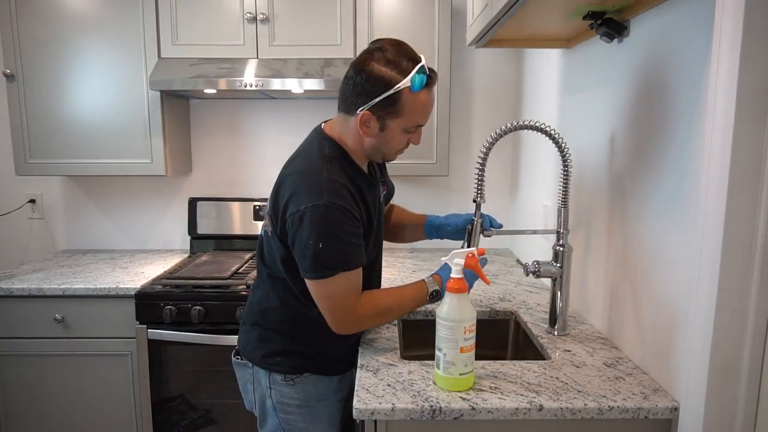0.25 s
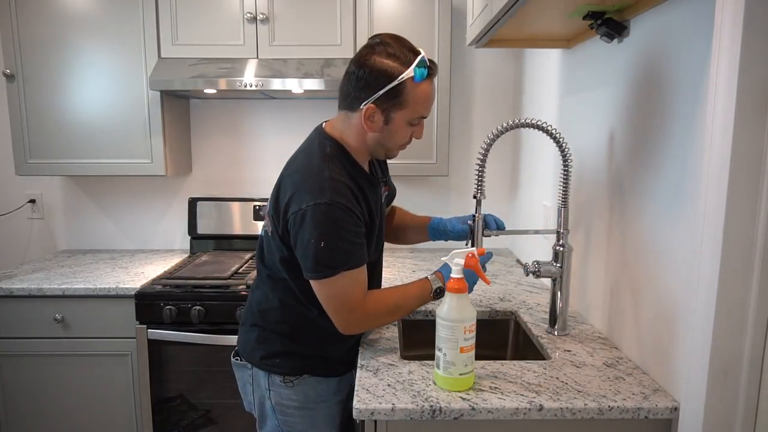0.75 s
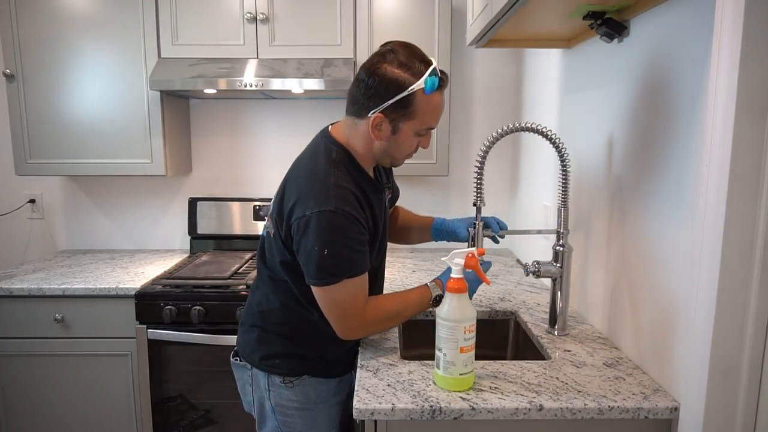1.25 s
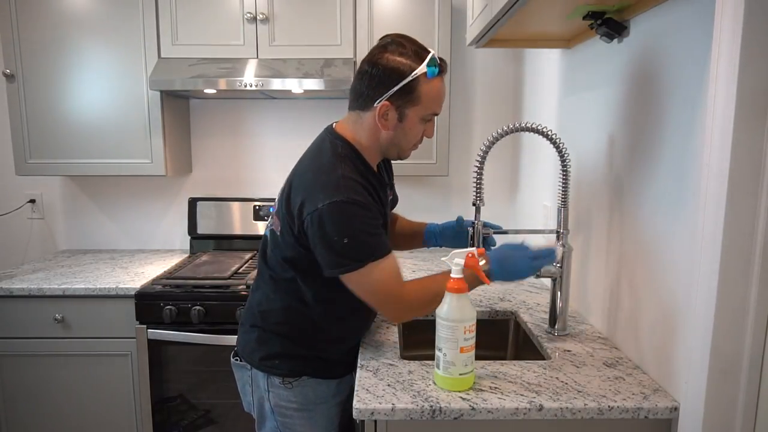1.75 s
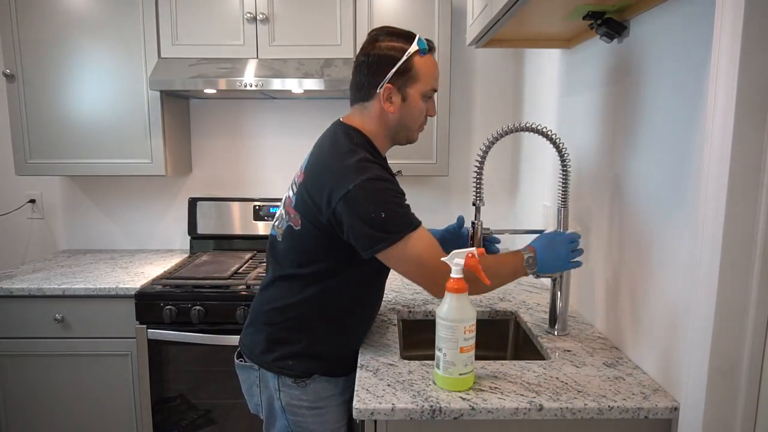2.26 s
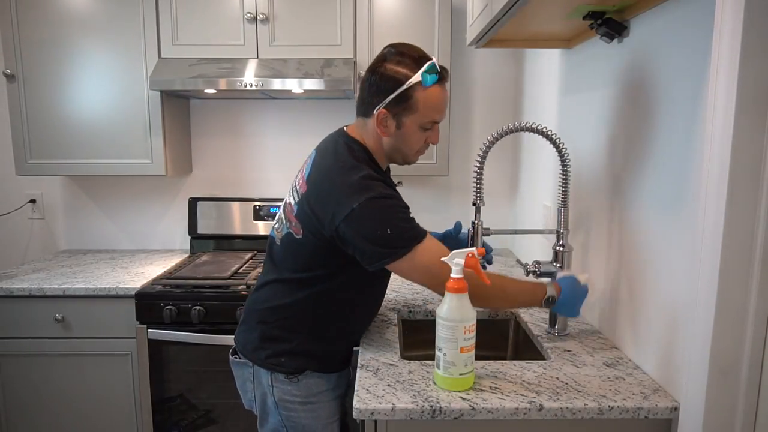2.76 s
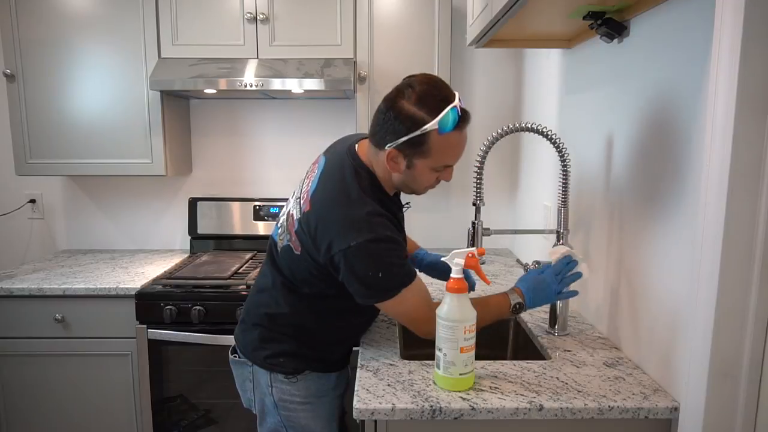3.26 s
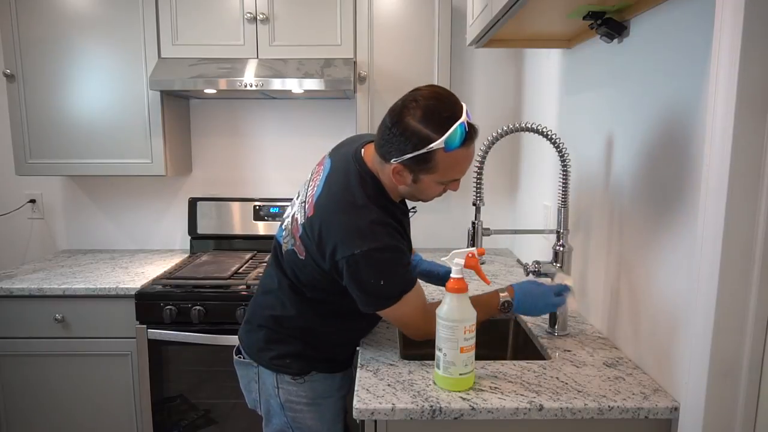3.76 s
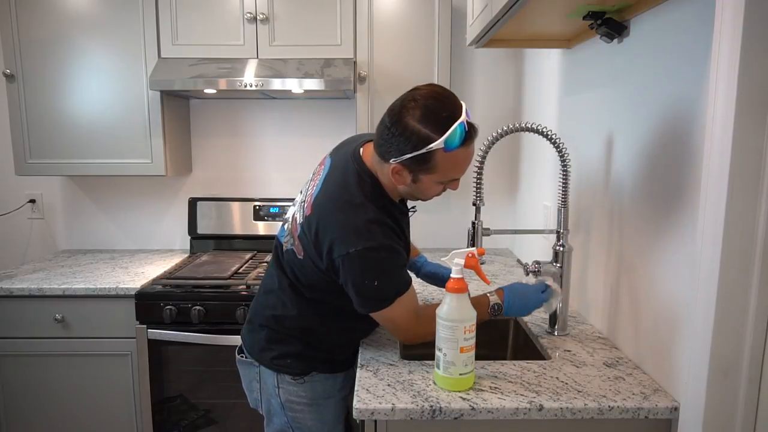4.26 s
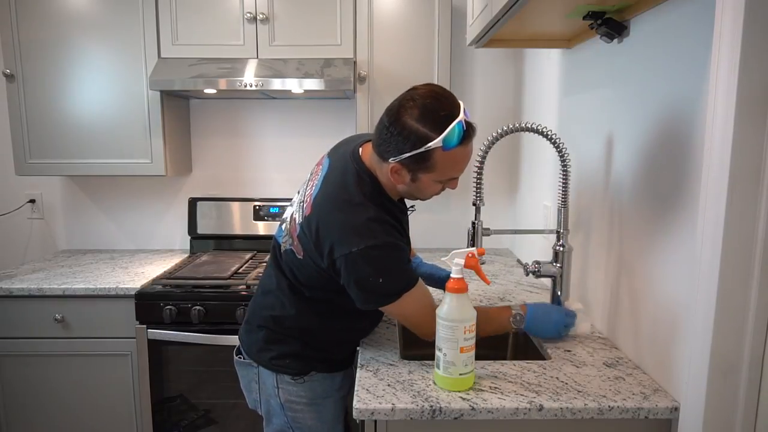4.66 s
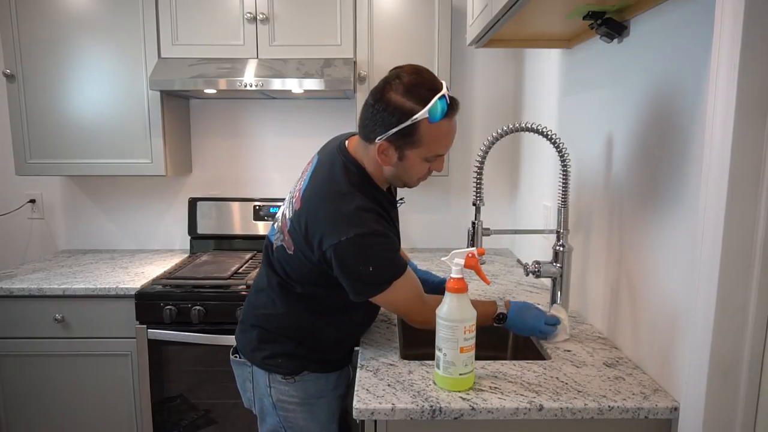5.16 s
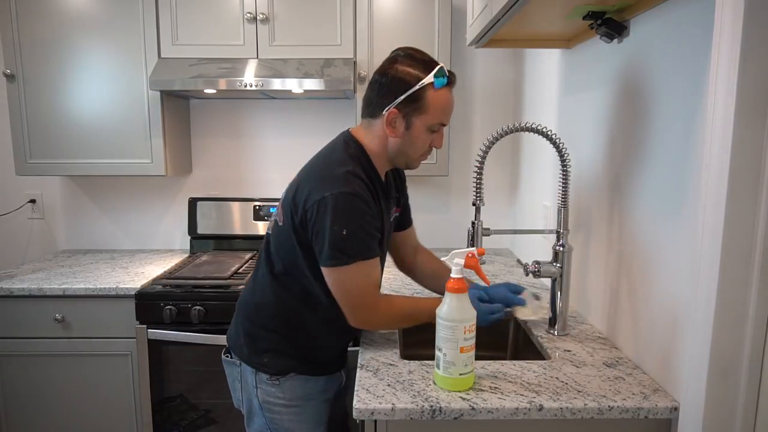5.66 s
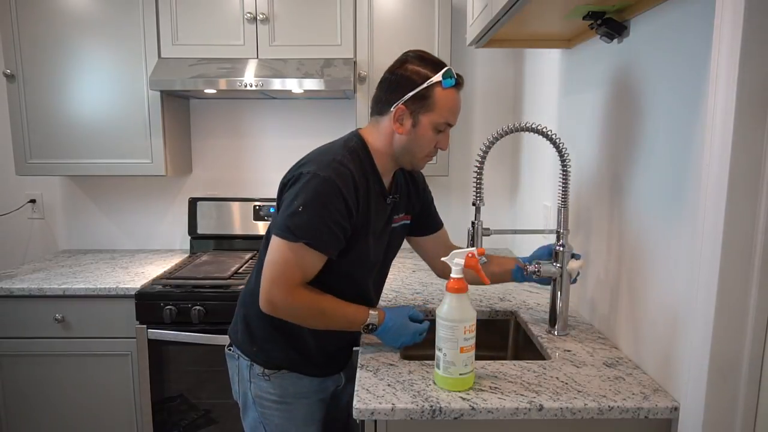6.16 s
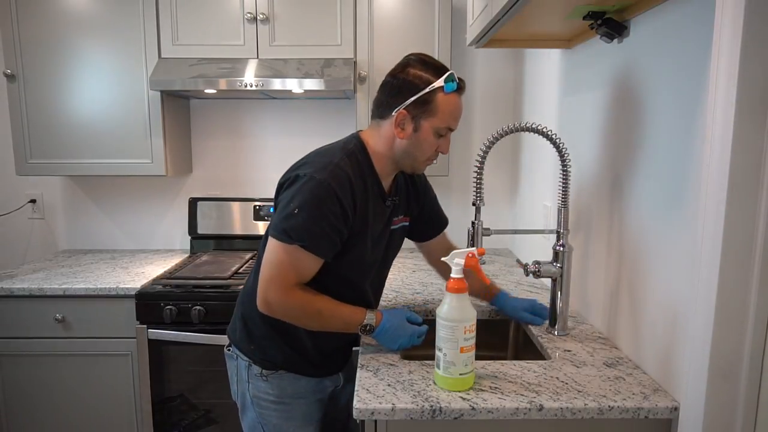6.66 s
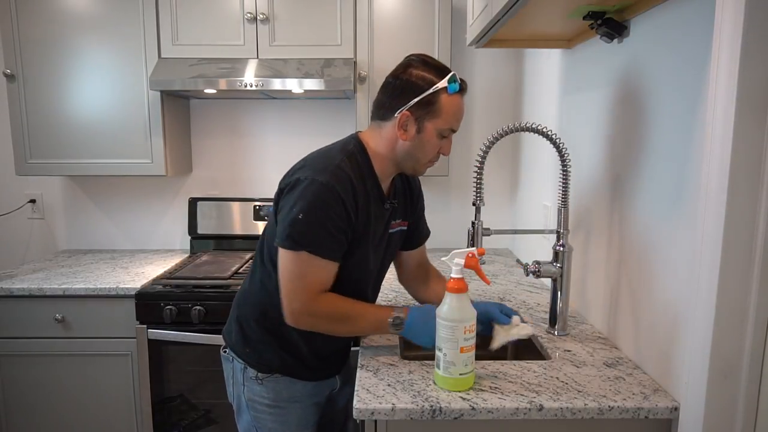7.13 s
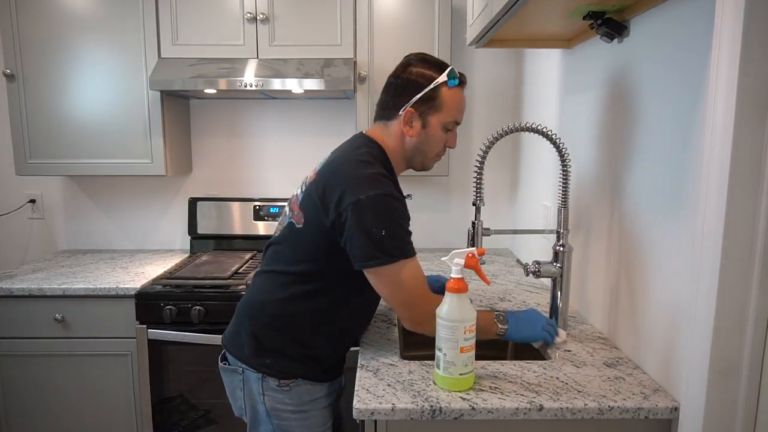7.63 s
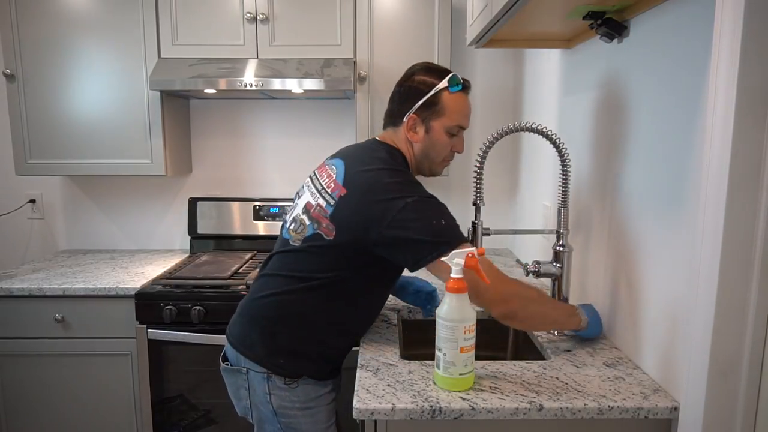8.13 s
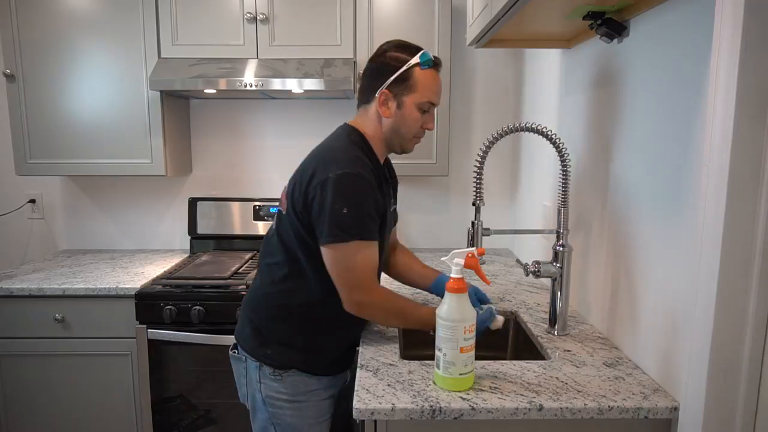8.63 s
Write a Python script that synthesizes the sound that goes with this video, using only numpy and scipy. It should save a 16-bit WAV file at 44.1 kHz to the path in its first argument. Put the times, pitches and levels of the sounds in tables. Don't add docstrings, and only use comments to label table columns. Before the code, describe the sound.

Quiet hard-walled kitchen with a steady low hum and floor rumble. After a brief swish and a dull knock comes a near pause, then one sharp metal clack with small basin pings. A gloved hand then wipes the faucet in faint short strokes, ticking against metal, and moves to broader, slightly louder strokes over the counter. The microphone is near and picks up low stand bumps; stereo briefly narrows to mono.

```python
import sys
import numpy as np
from scipy import signal
from scipy.fft import rfft, irfft, next_fast_len
from scipy.io import wavfile
from scipy.ndimage import uniform_filter1d, map_coordinates

SR = 44100
rng = np.random.default_rng(int(sys.argv[2]) if len(sys.argv) > 2 else 0)


def amp(db):
    return 10 ** (np.asarray(db, float) / 20)


def to_wav(s):
    ch = np.atleast_2d(s).T
    pcm = np.round(np.clip(ch, -1, 1) * 32767)
    wavfile.write(sys.argv[1], SR, pcm.astype(np.int16))


N = 392084
TIME = np.arange(N) / SR


def unit(x):
    return x / np.sqrt(np.mean(x ** 2) + 1e-20)


def along(points, hz):
    f, v = np.transpose(points)
    return np.interp(np.log(hz + 1), np.log(f + 1), v)


def curve(rows):
    s, value = np.transpose(rows)
    return np.interp(TIME, s, value)


def wobble(rate_hz):
    knots = rng.standard_normal(int(N * rate_hz / SR) + 4)
    return map_coordinates(knots, [TIME * rate_hz])


def filtered(x, response):
    m = next_fast_len(len(x) + 8192)
    return irfft(rfft(x, m) * response(np.fft.rfftfreq(m, 1 / SR)), m)[:len(x)]


def below(hz, corner_hz):
    return 1 / (1 + (hz / corner_hz) ** 6)


def above(hz, corner_hz, order=6):
    return 1 / (1 + (corner_hz / (hz + 1)) ** order)


def noise(spectrum):
    return unit(filtered(rng.standard_normal(N), lambda hz: amp(along(spectrum, hz))))


def resonance(hz, centre_hz, width_hz):
    return 1j * hz * width_hz / (centre_hz ** 2 - hz ** 2 + 1j * hz * width_hz)


def rough_ring(t, modes, rough):
    hz, db, t60_s = np.transpose(modes)[..., None]
    walk = np.cumsum(rng.standard_normal((len(modes), len(t))), axis=1) / np.sqrt(SR)
    drift = rough * np.sqrt(hz / 1000) * walk
    swell = 1 - np.exp(-.8 * hz * t)
    return np.sum(amp(db - 60 * t / t60_s) * swell * np.sin(2 * np.pi * hz * t + drift), axis=0)


def add_at(out, s, sound):
    out[round(s * SR):][:len(sound)] += sound


# f/Hz, density/dB per Hz
CLOTH_SPECTRUM = [(290, -12), (500, -7.5), (688, -3), (795, -6.5), (1180, -7), (1440, -5), (3200, 2.5),
                  (4340, -3.5), (10400, -16.5), (13400, -18.5), (16000, -18)]
# peak t/s, rub level/dB, press/s per 10 dB,
# ease/s per 10 dB, sink body/dB re rub
WIPES = [(0.0, -46, .02, 0.028, 5), (.04, -53, 0.038, 0.12, 3), (1.16, -64, 0.017, 0.036, 7),
         (.216, -58.5, 0.088, 0.036, 5.5), (1.5, -62, 0.24, 1, 1.5), (1.94, -61, .02, 0.019, 1),
         (2.01, -52.5, 0.031, 0.098, 5), (2.47, -58, 0.18, 0.045, 2), (2.64, -60, 0.098, 0.067, 3),
         (2.76, -56.5, 0.07, 0.11, 1.5), (2.95, -61.5, .012, 0.19, 5),
         (3.26, -54.5, 0.039, 0.047, 0), (3.3, -56, 0.043, 0.023, 4), (3.51, -59, .05, 0.078, 2),
         (3.76, -61, 0.12, 0.0083, 1), (3.88, -55.5, 0.019, 0.058, 8.5),
         (3.97, -56.5, 0.16, 0.025, -11), (4.19, -59, 0.032, 0.03, 9),
         (4.35, -58.5, 0.054, 0.012, 1), (4.44, -58.5, 0.024, 0.0065, 3),
         (4.609, -54.5, 0.018, 0.0048, 7), (4.77, -55.5, 0.019, 0.0091, 4),
         (5.08, -58.5, 0.077, 0.096, -7),
         (5.34, -57, 0.076, 0.037, 2.5), (5.54, -50, 0.047, 0.1, 1),
                 (5.68, -49.5, 0.049, 0.033, -11), (5.81, -58.5, .12, 0.14, 3), (5.96, -56, 0.13, 0.09, 4),
                 (6.31, -63, 0.029, 0.042, -3), (6.62, -52.5, 0.014, 0.15, 2.5),
                 (6.96, -56, 0.52, 0.04, -4), (7.11, -69, 0.064, 0.06, 8), (7.33, -50, 0.019, 0.22, -4),
                 (7.63, -55, 0.067, 0.25, -2.5), (7.98, -54.5, 0.96, 0.069, -1.5),
                 (8.17, -58, 0.035, 0.12, 6.5), (8.48, -53, 0.24, 0.052, 1), (8.66, -49, 0.027, .13, -0.5)]


def cloth(grain_db, patchy_db):
    grains = rng.standard_normal(N) * amp(grain_db * wobble(400))
    z = signal.stft(grains, nperseg=512)[2]
    patches = uniform_filter1d(uniform_filter1d(rng.standard_normal(z.shape), 6, 0), 8, 1)
    fibres = signal.istft(z * amp(patchy_db * unit(patches)), nperseg=512)[1][:N]
    fibres = filtered(fibres, lambda hz: amp(along(CLOTH_SPECTRUM, hz)))
    body = unit(filtered(fibres, lambda hz: below(hz, 1600)))
    rub = unit(filtered(fibres, lambda hz: above(hz, 1600) * below(hz, 6000)))
    fizz = unit(filtered(fibres, lambda hz: above(hz, 6000)))
    rest_db = -102
    rub_power = amp(2 * rest_db) * (TIME > KNOCKS[-1][0])
    body_power = rub_power.copy()
    for s, db, press_s, ease_s, body_db in WIPES:
        near = slice(max(round((s - 4 * press_s) * SR), 0), round((s + 4 * ease_s) * SR))
        t = TIME[near] - s
        power = amp(2 * db - 20 * np.maximum(-t / press_s, t / ease_s))
        rub_power[near] += power
        body_power[near] += power * amp(2 * body_db)
    fizz_level = amp(-66) * np.sqrt(rub_power / amp(-120))
    layers = np.sqrt(rub_power) * rub + amp(-2.0) * np.sqrt(body_power) * body + fizz_level * fizz
    return amp(.7 * wobble(25)) * layers


# t/s, length/s, level/dB, f/Hz, width/Hz
DRAGS = [(0, .26, -64, 14000, 3500), (0, .26, -61, 4450, 400), (.86, .14, -60, 680, 200),
         (1.07, .05, -67, 4800, 900), (1.282, .048, -41, 700, 600), (2.15, .08, -58, 680, 300),
         (2.94, .06, -58, 3350, 900), (3.0, .13, -58.5, 1350, 250), (3.48, .1, -61, 3300, 700),
         (4.31, .06, -60, 3100, 1100), (4.75, .04, -60, 3300, 1500), (5.01, .1, -60, 3300, 1100),
         (5.31, .06, -60, 3100, 1200), (4.585, .04, -57, 1200, 900), (4.8, .3, -66, 1350, 200),
         (5.19, .06, -56, 1500, 1200), (5.5, .087, -55, 430, 200), (5.52, .07, -55, 1150, 500),
         (5.53, .2, -57, 3000, 700), (6.58, .07, -57, 650, 300), (6.68, .08, -60, 2100, 600),
         (6.82, .07, -60, 2200, 1200), (6.84, .07, -59.5, 8100, 8000), (7.05, .1, -63, 4600, 500),
         (7.58, .07, -47.5, 195, 50), (7.76, .05, -55, 1200, 900), (7.9, .17, -56, 1460, 800),
         (8.11, .15, -55.5, 1520, 800), (8.15, .12, -55, 2800, 1500), (8.37, .16, -56.5, 4250, 1200),
         (8.64, .2, -65, 11000, 8000)]


def drags():
    out = np.zeros(N)
    for s, length_s, db, hz, width_hz in DRAGS:
        size = round(length_s * SR)
        drone = filtered(rng.standard_normal(SR // 2), lambda f: resonance(f, hz, width_hz) ** 2)[:size]
        add_at(out, s, amp(db + 1.5) * np.sqrt(np.hanning(size)) * unit(drone))
    return out


# f/Hz, t60/s
KITCHEN_DECAY = [(150, 1), (600, 0.79), (3000, 0.57), (8000, 0.29), (15000, 0.25)]


def kitchen(x):
    hz, t, z = signal.stft(rng.standard_normal(SR), SR, nperseg=256)
    fade = amp(-60 * t / along(KITCHEN_DECAY, hz)[:, None])
    tail = signal.istft(z * fade, SR, nperseg=256)[1]
    return signal.fftconvolve(np.pad(x, (300, 0)), tail / np.linalg.norm(tail))[:N]


# f/Hz, mid level/dB, side level/dB, side lead/rad
HUM = [(58.6, -49.5, -45.5, 1.2), (120.35, -38, -46, 1.18), (243.4, -62, -104, .3)]


def refrigerator():
    mid, side = np.zeros(N), np.zeros(N)
    for hz, mid_db, side_db, lead_rad in HUM:
        looseness = (120 / hz) ** 2
        phase = 2 * np.pi * hz * TIME + 2.54 + 0.37 * looseness * wobble(1.494)
        mid += np.sqrt(2) * amp(mid_db + .5 * looseness * wobble(1.255)) * np.cos(phase)
        side += np.sqrt(2) * amp(side_db + 1.0 * wobble(0.64)) * np.cos(phase + lead_rad)
    return mid, side


# f/Hz, density/dB per Hz
ROOM_TONE = [(12, -29), (25, -15), (60, 3), (100, -2), (160, -4.5), (190, -13), (300, -13.5), (485, -21.5),
             (1190, -31.5), (2500, -35), (3340, -32), (5380, -40), (9000, -44.5), (14700, -47),
             (16000, -54)]
# t/s, level/dB
RUSTLE = [(0, -1), (.3, -5.5), (1.28, -5), (1.5, 0), (8.9, 0)]


def room_tone():
    tone = amp(-44.5 + 0.65 * wobble(2.594)) * noise(ROOM_TONE)
    upper = filtered(tone, lambda hz: above(hz, 1100, order=4))
    tone = tone + (amp(curve(RUSTLE)) - 1) * upper
    still = amp(-.5 * np.interp(TIME, [.2, .28, 1.3, 1.4], [0, 1, 1, 0]))
    return tone + (still - 1) * filtered(tone, lambda hz: above(hz, 6000))


# f/Hz, density/dB per Hz
SIDE_TONE = [(15, -34), (38, -16), (50, 2.5), (62, 5), (75, -13), (150, -10), (200, -26), (290, -18),
             (340, -30), (420, -30), (976, -41), (1500, -45), (1900, -76), (16000, -64.5)]


def side_tone():
    return amp(-46.0 + 2.7 * wobble(2.51)) * noise(SIDE_TONE)


# t/s, level/dB
RUMBLE = [(0.0, -32), (0.17, -32), (0.57, -44.5), (2.35, -40), (2.4, -66), (2.45, -45), (3.19, -33),
          (3.29, -41), (3.94, -47), (4.41, -46), (4.53, -63), (4.61, -30.5), (5.02, -49.5), (7.57, -45),
          (7.7, -37), (8.07, -43.5), (8.37, -32.5), (8.89, -48)]


def floor_rumble():
    spectrum = [(10, -8.0), (23, -4), (33, -12), (60, -18.0), (110, -19.5), (200, -62.0), (600, -120)]
    return amp(curve(RUMBLE) - 2.5) * noise(spectrum)


# t/s, peak level/dB, f/Hz,
# crack/dB re peak
TAPS = [(1.258, -57, 7300, -14), (1.2858, -48, 850, -30), (1.574, -48, 891, -10), (1.747, -44, 2940, -25),
        (2.019, -48, 988, -19), (2.1698, -38.5, 1210, -24), (2.4676, -38.5, 1790, -28),
        (2.756, -44.5, 1620, -6), (3.027, -44, 1350, -18), (3.028, -41.5, 3200, -30),
        (3.164, -39.5, 1090, -29), (3.2424, -44, 800, -28), (3.278, -46, 3400, -28),
        (3.293, -48, 1300, -28), (3.3628, -39, 950, -26), (3.369, -50, 850, -28), (3.462, -39.5, 1410, -15),
        (3.657, -39.5, 790, -22), (3.659, -48, 1900, -24), (3.461, -47, 3000, -28),
        (3.883, -38.5, 802, -25), (4.321, -46, 3000, -26), (4.439, -62, 1360, -19),
        (4.591, -40.5, 850, -19), (4.603, -46, 1150, -12), (5.181, -34, 2700, -42),
        (5.181, -39.5, 1420, -45), (5.185, -39, 865, -45), (5.199, -41, 1510, -45), (5.198, -35, 3300, -40),
        (5.327, -46, 3000, -25), (5.472, -38, 840, -27), (5.479, -43, 800, -25), (6.31, -42, 2500, -22),
        (6.601, -41, 1050, -35), (6.615, -41, 1800, -30), (7.278, -40.5, 810, -26), (7.622, -42, 3200, -22),
        (7.3251, -36.5, 3150, -26), (7.779, -39, 950, -30), (8.134, -42, 860, -23),
        (8.626, -39.5, 774, -25),
        (.315, -53, 7400, -12), (1.08, -46, 4600, 3), (1.084, -48, 8800, -10), (1.156, -49, 3200, -12),
         (1.157, -53, 10500, -12), (1.172, -56, 10200, -14), (1.5392, -36, 1000, -18),
         (2.942, -47, 1150, -1.5), (4.364, -52.5, 802, 2), (4.75, -54, 1610, -10), (4.856, -50, 890, -1.5),
         (5.679, -36, 3340, -12), (6.2744, -41, 840, -10)]


def taps():
    out, t = np.zeros(N + SR), np.arange(SR // 10) / SR
    for s, db, hz, crack_db in TAPS:
        hiss = rng.standard_normal(len(t))
        burst = amp(-60 * t / 0.049) * hiss + 6.8 * (t == 0)
        width_hz = 0.31 * hz * (1000 / hz) ** 0.51
        knock = filtered(burst, lambda f: resonance(f, hz, width_hz) - 0.16 * resonance(f, 3400, 1360))
        crack = filtered(hiss, lambda f: resonance(f, 6800, 9000))
        crack = amp(crack_db - 2.5 - 60 * t / 0.026) * crack
        add_at(out, s, amp(db - 1.0) * (knock / abs(knock).max() + 1.7 * crack))
    return out[:N]


# t/s, level/dB
JOLTS = [(.367, -27.5), (.89, -35), (1.272, -28), (1.33, -30), (6.261, -34.5), (8.17, -51), (8.474, -50)]
# t/s, level/dB, f/Hz, t60/s
SWAY = [(0.381, -35, 101, 0.68), (.66, -50, 104, .5), (.9, -31, 92, 0.5), (1.147, -31, 87, 0.39),
        (1.297, -35, 92.6, 0.48), (2.039, -28.5, 90.8, 0.7), (4.56, -33, 98, 0.81), (4.75, -46, 96, 0.4),
        (5.2, -39, 97, 0.49), (5.88, -37, 95.3, 0.95), (6.27, -38, 93, 1), (6.581, -35.5, 93.4, 1.9),
        (7.601, -32.5, 92.6, 1), (8.48, -38, 98, 0.85)]


def stand():
    sway, jolts, t = np.zeros(N + SR), np.zeros(N + SR), np.arange(SR) / SR
    mount = [(300, 3, 0.093), (400, -4, 0.13), (295, -14.0, 2.2), (610, -17, .08), (950, -20, .07)]
    for s, db in JOLTS:
        jolt = rough_ring(t, mount, rough=9.9)
        add_at(jolts, s, amp(db) * jolt * (1 - np.exp(-t / 0.0014)))
    for s, db, hz, t60_s in SWAY:
        swing = rough_ring(t, [(hz, 0, t60_s), (0.62 * hz, -5, 0.62 * t60_s)], rough=1.9)
        add_at(sway, s, amp(db + 4.0) * swing * (1 - np.exp(-t / 0.011)))
    return sway[:N], jolts[:N]


# t/s, blow level/dB, brightness/dB
KNOCKS = [
    (0.3788, -28.5, -30),
    (1.3021, -19.5, -2),
]
# t/s after the blow, level/dB, brightness/dB
RATTLE = [
    [(0, -4, -4), (.0045, 4, 9), (.009, -4, -9), (.014, -14, -2), (.03, -20, -2), (.082, -17, -8)],
    [(.0008, 1.5, 0), (.0024, 5, 0.5), (.0068, -2, -1.5), (.0102, -5, 2), (.0145, -10, 0), (.0275, -18, 0)],
]
# f/Hz, level/dB, t60/s
HOLDER = [(126.9, 3, 0.5), (249.4, -5, 0.18), (312, 4, 0.07), (400, -9, 0.22), (526, -12, 0.43),
          (577, -4.5, 0.17), (625, -2.5, 0.096), (1000, -23, 0.077)]
# f/Hz, level/dB, t60/s
SINK = [(118.7, -4.5, 0.51), (125.8, -2, 0.9), (187, -5.5, 0.16), (382, -14.5, 0.31), (533.5, -10.5, 0.59),
        (585, -11, 0.53), (605, -15.5, 0.58), (644, -29, 0.24), (802, -7, 0.054), (979, -4, 0.07),
        (1036, 2, 0.065), (1106, -21, .15), (2110, -13, 0.12), (2970, -24, 0.42), (3200, -22, 0.4)]
# f/Hz, level/dB, t60/s
FAUCET = [(4500, -36, 0.26), (5400, -29, 0.59), (6700, -5, 0.048), (7200, -24, 0.12), (8150, -43, 0.28),
          (10900, -9.5, 0.065), (10600, -37, .2), (10700, -26, 0.12), (12680, -40, .18), (13710, -37, .19)]
# f/Hz, density/dB per Hz
CRACK = [(59, -22), (100, -33), (300, -5.5), (620, -0.5), (850, -3.5), (1060, -7), (1390, -14),
         (3320, -9.5), (7140, -19), (9410, -18), (13800, -18), (16000, -19.5)]


def knocks():
    out, t = np.zeros(N + 2 * SR), np.arange(SR) / SR
    short = t[:SR // 4]
    crackle = noise(CRACK)
    shimmer = noise([(900, -32), (1500, 3), (3200, 1), (5500, -8), (8000, -17), (16000, -29)])[:SR]
    for (s, db, bright_db), modes, bounces in zip(KNOCKS, (HOLDER, SINK), RATTLE):
        add_at(out, s, amp(db - 3.5) * rough_ring(t, modes, rough=9.6))
        add_at(out, s, amp(db + bright_db - 25 - 60 * t / 0.9) * (1 - np.exp(-t / 0.009)) * shimmer)
        for lag_s, bounce_db, sharp_db in bounces:
            crack = crackle[rng.integers(0, N - SR):][:len(short)]
            burst = (amp(-60 * short / 0.023) + amp(-22.0 - 60 * short / 0.1)) * crack
            dull = uniform_filter1d(burst, size=9)
            bright = burst - dull + .5 * rough_ring(short, FAUCET, rough=16.7)
            bounce = dull + amp(bright_db + sharp_db) * bright
            add_at(out, s + lag_s, amp(db + bounce_db - 6.0) * bounce)
    s, db, _ = KNOCKS[-1]
    push_hz, push_width_hz, push_lag_s = 790, 490, 0.00019
    push = amp(-np.pi * push_width_hz * 8.7 * t) * np.sin(2 * np.pi * push_hz * t)
    add_at(out, s + push_lag_s, amp(db + 4.5) * push)
    return out[:N]


# t/s, level/dB
PINGS = [(0.556, -35.5), (1.2484, -47.5), (1.372, -41), (1.471, -50), (1.539, -36.5)]


def hose_weight():
    out, t = np.zeros(N + SR), np.arange(SR // 10) / SR
    for s, db in PINGS:
        ping = rough_ring(t, [(982, -1.0, 0.059), (2130, -10, 0.021), (4350, -9, 0.01)], rough=17.0)
        add_at(out, s, amp(db) * ping)
    return out[:N]


def scene():
    strokes = cloth(grain_db=1.8, patchy_db=1.6) + drags()
    hum_mid, hum_side = refrigerator()
    hits = taps() + knocks() + hose_weight()
    sway, jolts = stand()
    mid = hits + amp(-7.0) * kitchen(hits)
    mid += amp(-1.5) * strokes + amp(-14.0) * kitchen(strokes)
    mid += floor_rumble() + room_tone() + hum_mid
    mid += amp(-7.0) * np.roll(sway, 120)
    side = hum_side + sway + jolts + side_tone()
    return np.array([mid + side, mid - side])


def band_limit(x):
    return signal.sosfilt(signal.butter(12, 16520, fs=SR, output="sos"), x)


# t/s, side gain/dB, side band limit f/Hz
WIDTH = [(0, -2, 16000), (1.41, 0.5, 16000), (1.42, 1, 800), (1.55, -9, 550), (1.81, -28, 350),
         (1.82, -90, 300), (2.02, -89, 250), (2.03, -15, 250), (2.2, -31, 250), (2.21, -90, 250),
         (3.85, -90, 400), (3.87, -21, 400), (4.1, -13, 1200), (4.5, -4, 16000), (8.9, -0.5, 16000)]


def record(dry):
    mid, side = (dry[0] + dry[1]) / 2, (dry[0] - dry[1]) / 2
    s, gain_db, limit_hz = np.transpose(WIDTH)
    side = filtered(side, lambda f: above(f, 44)) * amp(np.interp(TIME, s, gain_db))
    hz, t, z = signal.stft(side, SR, nperseg=1024)
    hz = hz[:, None]
    kept = hz < np.exp(np.interp(t, s, np.log(limit_hz)))
    flicker = np.repeat(rng.standard_normal(len(t)), 3)[:len(t)]
    kept &= hz < 1300 * np.exp(.35 * flicker) + 16000 * (hz > 6000)
    side = signal.istft(z * kept * above(hz, 44, order=4), SR, nperseg=1024)[1][:N]
    mid = filtered(mid, lambda f: f < 15850)
    mix = np.array([mid + side, mid - side])
    return band_limit(mix)


dry = scene()
out = record(dry)
to_wav(out)
```